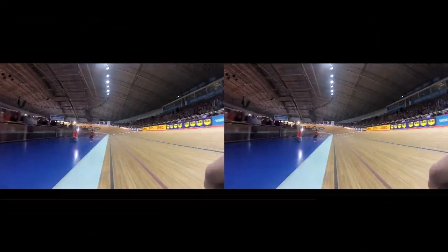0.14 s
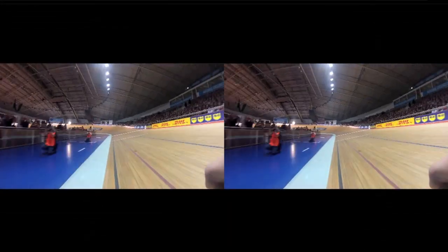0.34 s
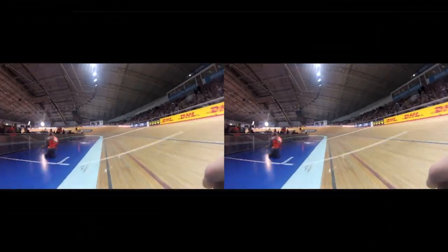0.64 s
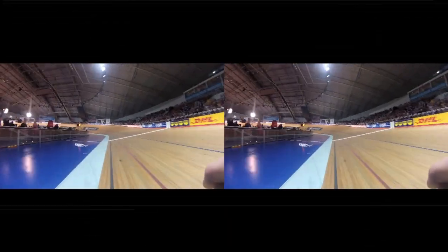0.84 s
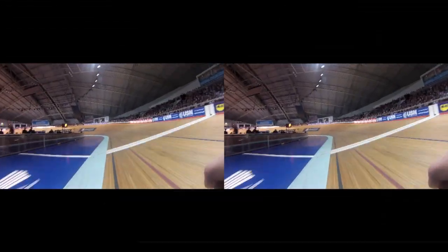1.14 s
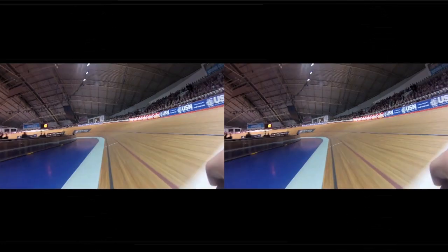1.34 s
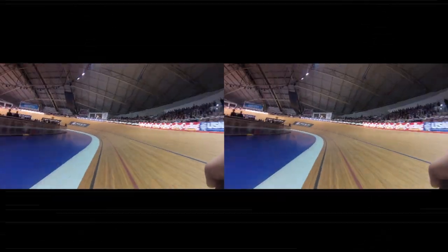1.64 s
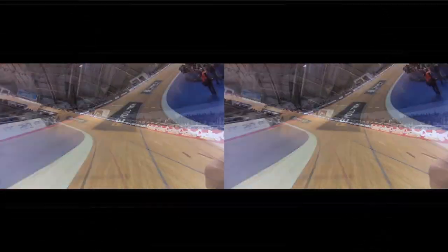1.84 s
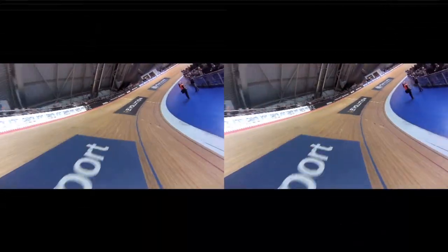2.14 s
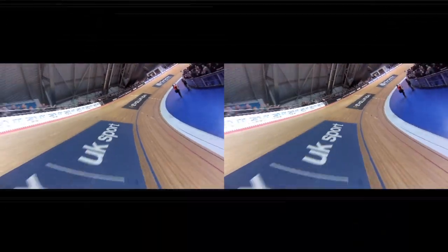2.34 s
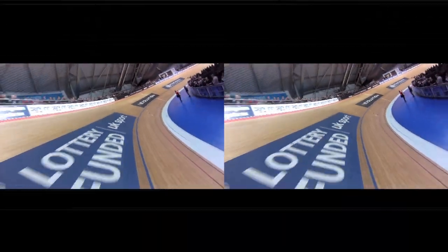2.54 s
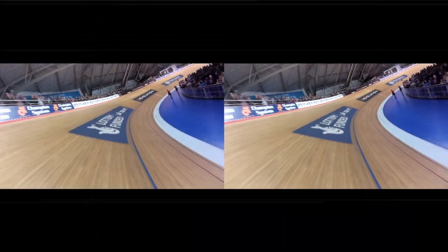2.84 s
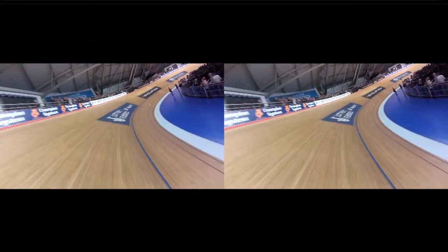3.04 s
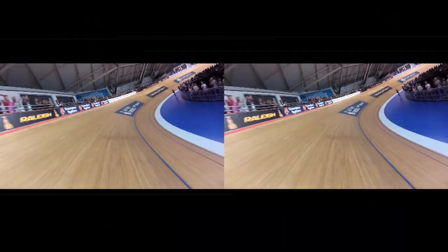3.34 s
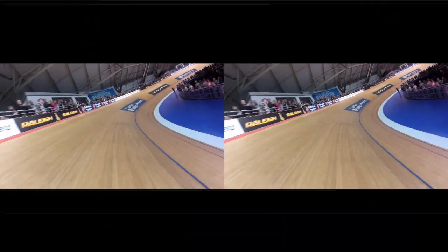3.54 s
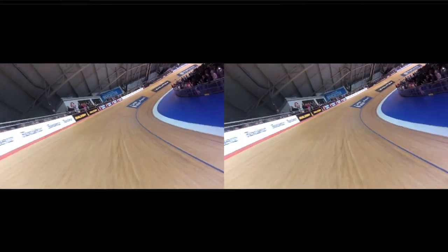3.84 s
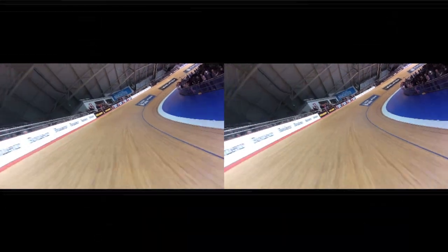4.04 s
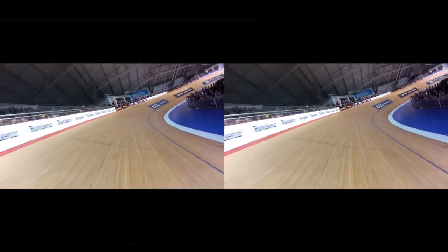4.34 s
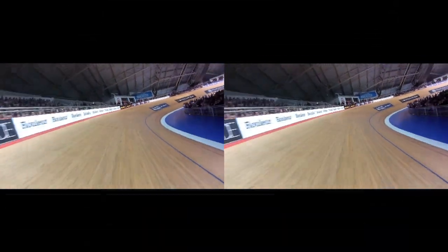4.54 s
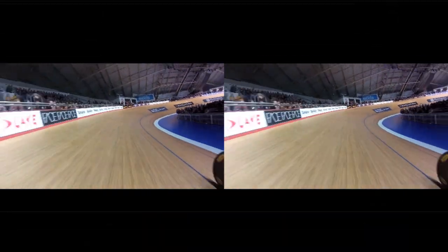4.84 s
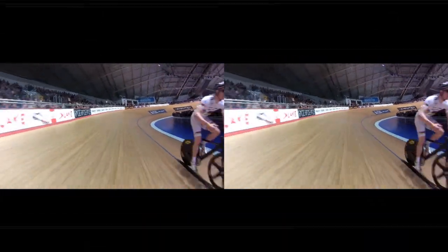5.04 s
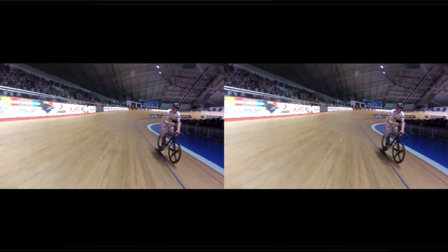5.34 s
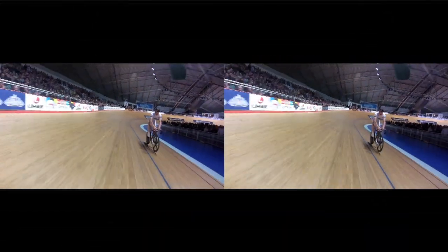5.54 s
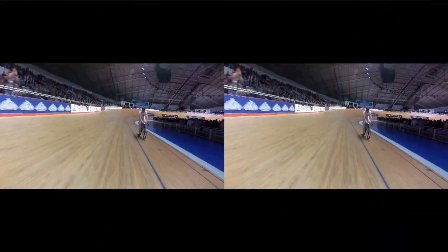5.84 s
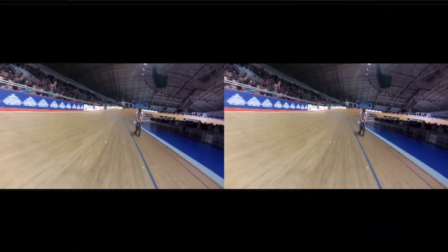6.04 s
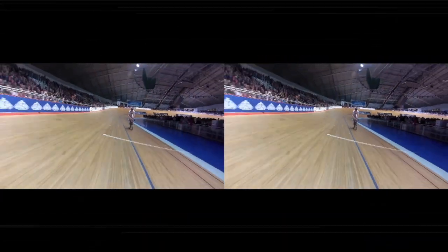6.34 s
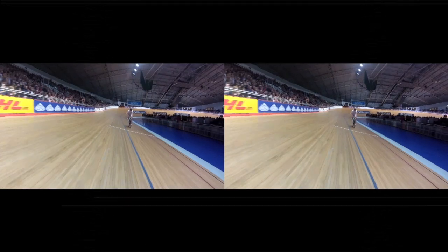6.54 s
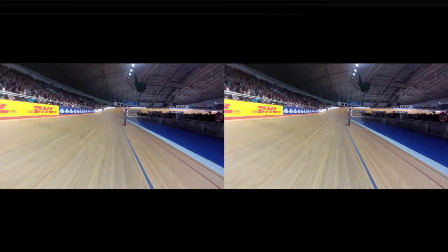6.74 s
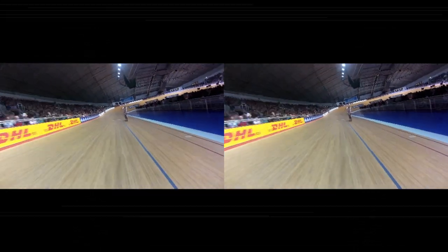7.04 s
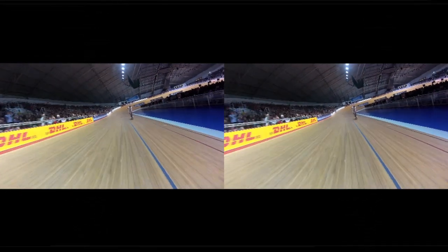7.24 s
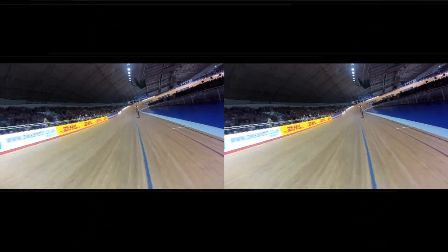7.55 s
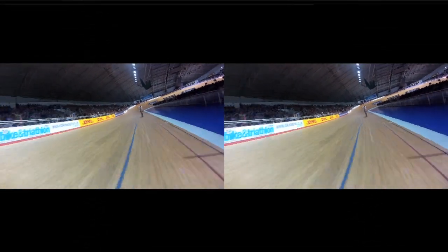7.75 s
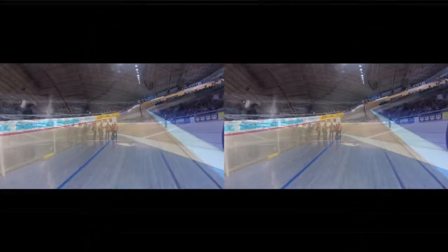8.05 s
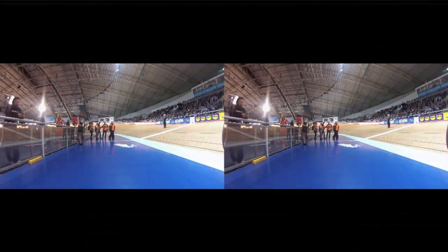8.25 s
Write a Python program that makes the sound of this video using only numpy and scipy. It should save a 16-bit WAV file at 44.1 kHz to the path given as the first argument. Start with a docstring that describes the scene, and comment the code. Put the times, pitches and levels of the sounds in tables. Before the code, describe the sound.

A microphone fixed to a speeding bike picks up heavy, wavering low rumble from wind and wooden boards. Gusts ripple through thin airy noise, while dull thumps and gritty overload punctuate it at random. The pitch sinks after the first couple of seconds, judders hard in the middle and later stretches, then dips and shifts to another colour, with more air at the close.

```python
"""Bicycle ride on a wooden indoor track

A camera rides on a fast bicycle, heard from three mounts that fade into each other. Wind and boards shake
the mount: wandering near-sine drones and noise-driven resonances. Air and tyres rush through the case as
coloured noise; hollows howl and gaps whistle as narrow noise bands. Hard buffets thump and overload the
microphone with a short crackle. A few brief squeaks and one puff of hiss lie on top."""
import sys
import numpy as np
from scipy import signal
from scipy.fft import rfft, irfft, next_fast_len
from scipy.io import wavfile
from scipy.ndimage import uniform_filter1d, map_coordinates

SR = 44100
rng = np.random.default_rng(int(sys.argv[2]) if len(sys.argv) > 2 else 0)


def dump_mix(stems):
    """Bounce the given channels to the path in sys.argv[1] as a 16-bit WAV at rate SR."""
    frames = np.atleast_2d(stems).T  # one column per channel
    limited = np.clip(frames, -1, 1)  # hard clip at full scale
    pcm = np.round(limited * 32767).astype(np.int16)
    wavfile.write(sys.argv[1], SR, pcm)


N = 369999
T = np.arange(N) / SR  # time of each sample (s)

# low shaking of the mount before lulls, sagging in the fades: time_s, level_db
SHAKE = [(0, -16), (1.2, -14.5), (1.93, -17), (2.4, -15.5), (8.05, -16), (8.17, -26), (8.39, -16)]
# brief dips in the shaking: middle_s, change_db
LULLS = [(1.6, -5.5), (1.733, -5), (3.34, -7.5), (4.37, -8), (5.135, -8), (5.99, -7)]
# jolts from the boards that set the mount juddering: middle_s, rise_db
JOLTS = [(.807, 11), (2.314, 9), (2.93, 9), (3.401, 5.5), (4.974, 8.5), (5.22, 14), (5.342, 5),
         (5.918, 0.5), (6.04, 8.5), (7.193, 8), (7.35, 12.5), (7.667, 13.5), (7.916, 9.5)]
# steady airflow over the case between gusts: time_s, level_db
AIR = [(0.0, -46.5), (0.9, -47.5), (1.3, -52), (2.1, -47.5), (2.85, -51), (4.6, -49.5), (5.35, -51.5),
       (6.1, -48.5), (6.65, -56), (7.6, -50.5), (8.16, -55.5), (8.39, -38.5)]
# gusts, about three a second: middle_s, length_s, rise_db
GUSTS = [(0.165, 0.1, 2), (0.298, 0.07, 5.5), (0.727, 0.16, 5.5), (1.066, 0.053, 5.5), (1.464, 0.13, 4),
         (2.304, 0.066, 4), (2.457, 0.15, 6.5), (2.597, 0.13, 5), (2.758, 0.08, 4.5), (3.078, 0.19, 3),
         (3.331, 0.12, 3), (3.59, 0.064, 2.5), (3.739, 0.029, 5.0), (3.912, 0.1, 3), (4.082, 0.06, 4.5),
         (4.457, 0.23, 5), (4.793, 0.09, 3), (5.021, 0.11, 5.5), (5.635, 0.14, 6), (5.899, 0.16, 2),
         (6.241, 0.13, 5.5), (6.535, 0.09, 6.5), (6.825, 0.11, 7.5), (7.146, 0.14, 9.5), (7.337, 0.17, 6.5),
         (7.742, 0.09, 5), (8.058, 0.11, 5.5)]
# fades from one mount to the next: start_s, end_s
FADES = [(1.681, 2.2), (8.002, 8.36)]
# upper resonances of the stiff first and last mount, then of the soft middle one:
# pitch_hz, width_hz, relative level_db
STIFF_UPPER = [(228, 36, 1), (325, 27, 3), (358.6, 13, -0.5)]
SOFT_UPPER = [(272.1, 16.7, 10.5), (312, 130, -13.5)]
# colour of the turbulent pressure on the case: pitch_hz, relative level_db per Hz
EDDIES = [(12, -7.5), (28, -4), (48, 2), (85, 5.5), (110, -6), (140, -15.5), (180, -18), (240, -20),
          (400, -38.5), (600, -80)]
# hard buffets: time_s, relative strength_db
BUFFETS = [(0.2239, -32), (0.3349, -25), (0.7121, -39), (0.8554, -33), (1.417, -34.5), (1.5473, -31),
           (1.6731, -31.5), (2.1509, -35.5), (2.5359, -32), (2.736, -31), (2.943, -37), (3.2849, -29.5),
           (3.4161, -31.5), (3.6261, -27), (4.338, -37), (4.405, -32.5), (4.6614, -36), (5.0502, -29),
           (5.2227, -24), (5.3495, -28), (5.9239, -20.5), (6.09, -27), (6.4073, -32.5), (7.2084, -31),
           (7.391, -23.5), (7.7273, -29), (7.9293, -30.5)]
# colour of air and tyres through the case, mount by mount: pitch_hz, relative level_db per Hz
FIRST_RUSH = [(250, -5.5), (450, 1), (620, 3), (740, 4.5), (920, -7), (1100, -5.5), (1230, 3), (1500, 0),
              (1720, -3), (1930, 3.5), (2250, -7.5), (2800, -16.5), (5800, -27.5), (15000, -60)]
MIDDLE_RUSH = [(250, 11), (400, -6), (520, -1.5), (620, 11.5), (780, -1.5), (980, -4), (1200, 2), (1410, 9),
               (1900, 3), (2330, 6), (2800, -14.5), (6500, -77), (15000, -64)]
LAST_RUSH = [(250, -12), (480, -10), (720, -5), (950, -10.5), (1400, 4.5), (2200, 0.5), (3700, -13),
             (5100, -10.5), (6500, -22), (15000, -40)]
# faint rustle in the valleys between the gaps' whistles: pitch_hz, relative level_db per Hz
RUSTLE = [(1500, -19.5), (2800, 0), (4400, -4), (7000, -8), (15000, -25.5)]
# hollow resonances of the case on the last mount: pitch_hz, width_hz, relative level_db
LAST_HOLLOWS = [(527, 15, -1.5), (693, 17, 1), (1340, 44, -2.5)]
# whistling gaps of the case on the first and middle mount: pitch_hz, width_hz, relative level_db
FIRST_GAPS = [(3780, 160, 0), (4210, 170, -2), (4780, 260, -5), (5120, 220, -4), (5950, 300, -14)]
MIDDLE_GAPS = [(3672, 85, 0), (5000, 200, -10)]
# colour of the middle mount's sputtering hiss: pitch_hz, relative level_db per Hz
HISS = [(2000, -14.5), (4000, 3.5), (6500, 8.5), (9000, -15.5), (15000, -15.5)]
# colour of the overloaded microphone's crackle: pitch_hz, relative level_db per Hz
CRACKLE = [(500, -1), (1500, 3), (3200, 1), (4700, -5), (6300, -8.5), (12000, -16.5), (15500, -28)]
# brief squeaks: middle_s, mean pitch_hz, level_db at the peak (rms of the sine)
SQUEAKS = [(2.116, 1450, -35.5), (2.321, 1440, -37.5), (2.478, 1300, -41), (6.022, 1370, -38),
           (6.115, 1430, -42)]

STIFF_HZ, SOFT_HZ = 116, 95.3  # lowest resonance of the stiff and of the soft mount
LULL_S, JOLT_S = 0.065, 0.055  # lengths
CRUISE_DB = -48.6  # usual airflow; flow_db counts from it
# judder of the upper resonances in usual airflow (dB), and its growth (dB per dB of airflow)
JUDDER_DB, JUDDER_PER_AIR = -38.5, 0.65
# thump of a buffet of average strength (dB), and its growth (dB per dB of strength)
THUMP_DB, THUMP_PER_STRENGTH = -7, 0.3
# whistle against rush (dB), and the middle mount's extra growth (dB per dB of airflow)
FIRST_WHISTLE_DB, MIDDLE_WHISTLE_DB, WHISTLE_PER_AIR = -14, -15, 0.76
TOP_HZ = 15500  # upper limit of the camera's sound


def rumble(first, middle, last, eddy, flow_db):
    """Smooth flow lets the mount drone; rough flow and jolts judder it and bury the drone in eddies."""
    judder_db = JUDDER_PER_AIR * flow_db + sum(db * swell(s, JOLT_S) for s, db in JOLTS)

    # the first mount's drone dies away early in its fade
    stiff_drone = (first ** 3 + last) * shedding(STIFF_HZ, wobble=.025, throb_db=3.5)
    soft_drone = middle * shedding(SOFT_HZ, wobble=.018, throb_db=2.0)
    # on the first mount the gusts break up the drone
    drone = (stiff_drone + soft_drone) * undb(-.6 * first * (flow_db - 1.5))

    rough_db = 0.18 * judder_db + 0.7 * flow_db - 5.0 * first
    pressure = noise(EDDIES) * undb(rough_db + 2.4 * eddy - 2.5)
    low = steady(drone + pressure, seconds=0.23, amount=1.0)

    stiff_upper = (first + last) * ringing(STIFF_UPPER, skirt=2.1)
    soft_upper = middle * ringing(SOFT_UPPER, skirt=3.7)
    upper = steady(stiff_upper + soft_upper, seconds=1.0, amount=0.34) * undb(1.9 * eddy)

    shake_db = curve(SHAKE) + sum(db * swell(s, LULL_S) for s, db in LULLS)
    return undb(shake_db) * low + undb(JUDDER_DB + judder_db) * upper


def shedding(hz, wobble, throb_db):
    """Vortices lock on to a resonance: a near sine that wanders in pitch and strength."""
    cycles = np.cumsum(hz * (1 + wobble * walk(22))) / SR
    # each hard buffet pulls the vortices into step, so that it lands on a crest of suction
    times = np.transpose(BUFFETS)[0]
    slip = np.unwrap(2 * np.pi * (np.interp(times, T, cycles) % 1))
    phase = 2 * np.pi * cycles - np.interp(T, times, slip)
    return unit(-np.cos(phase) * undb(throb_db * walk(20)))


def buffets(low, thump_s, thump_hz, knock_s, knock_db, crackle_s, crackle_db):
    """Each hard eddy takes over the mount for a swing of suction; returns pressure and overload."""
    overload = np.zeros(N)
    usual_db = np.mean(BUFFETS, axis=0)[1]
    for s, strength_db in BUFFETS:
        thump_db = THUMP_DB + THUMP_PER_STRENGTH * (strength_db - usual_db)
        near = slice(int((s - .04) * SR), int((s + .04) * SR))
        t = T[near] - s - .001  # the swing centres 1 ms after the listed time

        # the thump replaces the rumble while the eddy grips the mount
        grip = np.exp(-(t / thump_s) ** 2)
        thump = -undb(thump_db) * np.cos(2 * np.pi * thump_hz * t)
        swing = np.zeros(N)
        swing[near] = grip * (thump - low[near])

        # the harder the buffet, the more it also knocks the soft mount's first upper resonance
        knock = np.cos(2 * np.pi * SOFT_UPPER[0][0] * t) / np.cosh(t / knock_s)
        swing[near] -= undb(strength_db + knock_db) * knock
        low = low + swing
        overload[near] += undb(strength_db + crackle_db) * np.exp(-(t / crackle_s) ** 2)
    return low, overload


def airflow(first, middle, last, eddy, flow_db):
    """Turbulent air sounds the case: rush, howls and whistles swell with the flow and flutter together."""
    flutter = unit(undb(1.0 * eddy + 2.0 * walk(190)))
    colours = (rush(first, middle, last)
               + howls(first, middle, last, flow_db)
               + whistles(first, middle, flow_db))
    return flutter * undb(CRUISE_DB + flow_db) * colours


def rush(first, middle, last):
    """Air and tyres heard through the case: broadband noise in each mount's colour."""
    first_rush = first * noise(FIRST_RUSH) * undb(3.0)
    middle_rush = middle * (noise(MIDDLE_RUSH) * undb(2.5) + noise(RUSTLE) * undb(-23.5))
    last_rush = last * noise(LAST_RUSH) * undb(2.0)
    return first_rush + middle_rush + last_rush


def howls(first, middle, last, flow_db):
    """Hollows of the case resonate in the stream: some rise with the gusts, some come and go at random."""
    gusty_howl = ringing([(712, 58, 0)], skirt=2.2) * undb(-6 + 1.1 * flow_db)
    fitful_howl = ringing([(1982, 160, 0)], skirt=2) * undb(-6.5 + 3.8 * walk(25))
    chirps = ringing([(1401, 44, 0)], skirt=2.4) * undb(-11.5 + 10 * np.tanh(walk(25)))
    gusty_high = ringing([(2284, 110, 0)], skirt=3) * undb(-10.5 + 1.2 * flow_db)
    hollows = ringing(LAST_HOLLOWS, skirt=3) * undb(-2)
    return first * (gusty_howl + fitful_howl) + middle * (chirps + gusty_high) + last * hollows


def whistles(first, middle, flow_db):
    """Air forced through gaps in the case whistles in narrow bands and sputters as hiss."""
    first_whistle = first * ringing(FIRST_GAPS, skirt=2.1) * undb(FIRST_WHISTLE_DB + 2.5 * walk(30))
    whistle = middle ** 3 * ringing(MIDDLE_GAPS, skirt=5.5) * undb(-3.5 + 5.4 * np.tanh(walk(40)))
    hiss = middle * noise(HISS) * undb(-13.5 + 3.3 * walk(130))
    # these two grow faster with the flow than the rush does
    return first_whistle + (whistle + hiss) * undb(MIDDLE_WHISTLE_DB + WHISTLE_PER_AIR * flow_db)


def crackle(low, overload, knee, span, crest_db, push_share):
    """The microphone crackles at the crests of the rumble, more under suction than under pressure."""
    crest = np.maximum(-low, push_share * low)
    excess = np.clip((crest - knee) / span, 0, 1) ** 2
    crest_gain = undb(crest_db + 4.0 * np.tanh(walk(60)))
    return noise(CRACKLE) * (overload + crest_gain * excess)


def squeaks(length_s):
    """The case rubs on its mount: short sine chirps that waver in pitch under a bell-shaped envelope."""
    cycles = np.cumsum(1 + 0.0022 * walk(120)) / SR  # cycles of a wavering 1 Hz
    out = np.zeros(N)
    for s, hz, db in SQUEAKS:
        near = np.abs(T - s) < 4 * length_s
        envelope = np.exp(-((T[near] - s) / length_s) ** 2)
        out[near] += undb(db) * np.sqrt(2) * envelope * np.sin(2 * np.pi * hz * cycles[near])
    return out


def puff(s, length_s, hz, width_hz, db):
    """A short, soft, airy hiss: one band of noise that swells and fades."""
    return ringing([(hz, width_hz, 0)], skirt=3) * undb(db) * swell(s, length_s)


def flow():
    """Airflow above its usual level (dB): the steady stream, the gusts and a little unrest."""
    gusts = sum(db * swell(s, length_s) for s, length_s, db in GUSTS)
    return curve(AIR) - CRUISE_DB + gusts + 0.37 * walk(18)


def mounts():
    """Equal-power shares of the three mounts."""
    a, b = (np.clip((T - start) / (end - start), 0, 1) for start, end in FADES)
    return np.sqrt(1 - a), np.sqrt(a * (1 - b)), np.sqrt(b)


def ringing(modes, skirt):
    """Resonances driven by turbulence; beyond skirt widths from centre the flanks fall twice as steeply."""
    size = next_fast_len(N)
    f = np.fft.rfftfreq(size, 1 / SR) + 1  # 1 Hz up, to avoid dividing by zero
    power = 0
    for hz, width, db in modes:
        detune = (f / hz - hz / f) * hz / width
        power = power + undb(db) ** 2 / (1 + detune ** 2) / (1 + (detune / skirt) ** 2)
    spectrum = rfft(rng.standard_normal(N), size) * np.sqrt(power)
    return unit(irfft(spectrum, size)[:N])


def noise(colour):
    """Random noise shaped by (Hz, dB) points joined on a logarithmic pitch scale, at rms 1."""
    hz, db = np.transpose(colour)
    size = next_fast_len(N)
    f = np.fft.rfftfreq(size, 1 / SR) + 1  # 1 Hz up, to avoid log of zero
    gain = undb(np.interp(np.log(f), np.log(hz), db))
    return unit(irfft(rfft(rng.standard_normal(N), size) * gain, size)[:N])


def steady(x, seconds, amount):
    """Even out the swells of a sound against its own running power."""
    size = int(seconds * SR / 2) + 1
    power = uniform_filter1d(uniform_filter1d(x ** 2, size), size)
    return unit(x / (np.abs(power) + 1e-9) ** (amount / 2))


def walk(rate):
    """Smooth random wandering with a spread of 1, through rate random points a second."""
    steps = rng.standard_normal(N // 50)
    return unit(map_coordinates(steps, [T * rate], order=3, mode="wrap"))


def swell(s, length_s):
    """A rounded, flat-topped rise from 0 to 1 and back, centred on s."""
    return np.exp(-np.minimum(np.square(np.square(2 * (T - s) / length_s)), 20))


def curve(table):
    """Straight lines between rows of (s, value), sample by sample."""
    return np.interp(T, *np.transpose(table))


def unit(x):
    """Scale to rms 1."""
    return x / np.sqrt(np.mean(x ** 2))


def undb(db):
    """Decibels to gain."""
    return 10 ** (np.asarray(db) / 20)


def scene():
    """Rumble, airflow, crackle, squeaks and a puff of hiss at the one microphone."""
    shares = mounts()
    flow_db = flow()
    eddy = walk(40)  # the same turbulence moves pressure, judder and rush
    shaking = rumble(*shares, eddy, flow_db)
    low, overload = buffets(shaking, thump_s=0.0053, thump_hz=85.4, knock_s=0.0038, knock_db=2.5,
                            crackle_s=.0013, crackle_db=-18.0)
    air = airflow(*shares, eddy, flow_db)
    grit = crackle(low, overload, knee=0.13, span=0.23, crest_db=-47.0, push_share=0.8)
    hiss = puff(s=8.005, length_s=0.082, hz=4750, width_hz=400, db=-63)
    return (low + air + grit + squeaks(length_s=0.0084) + hiss)[None]


def record(dry):
    """The camera cuts the top with a steep low-pass; the sound eases in and out over 4 ms."""
    ends = np.clip(np.minimum(T, T[-1] - T) / .004, 0, 1)
    low_pass = signal.ellip(12, .2, 80, TOP_HZ, fs=SR, output="sos")  # 0.2 dB ripple, 80 dB cut
    return ends * signal.sosfilt(low_pass, dry)


dry = scene()
out = record(dry)
dump_mix(out)
```